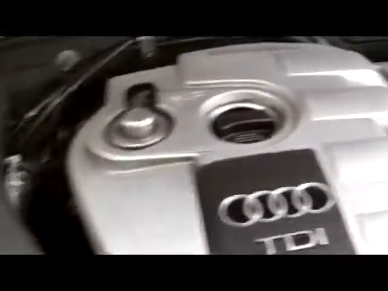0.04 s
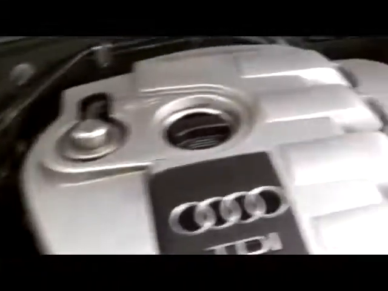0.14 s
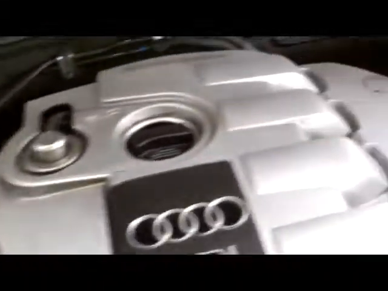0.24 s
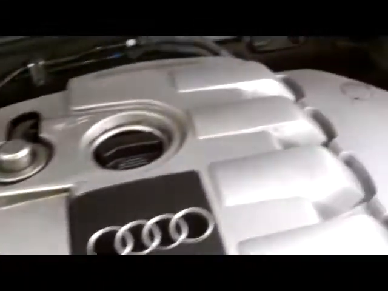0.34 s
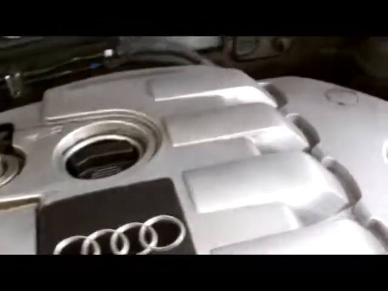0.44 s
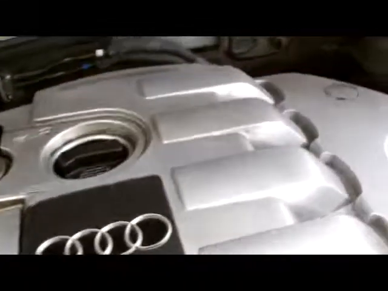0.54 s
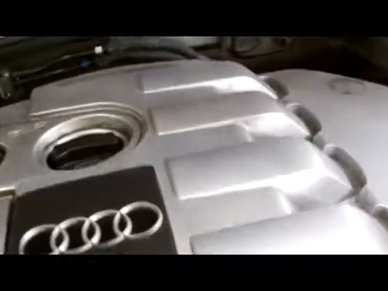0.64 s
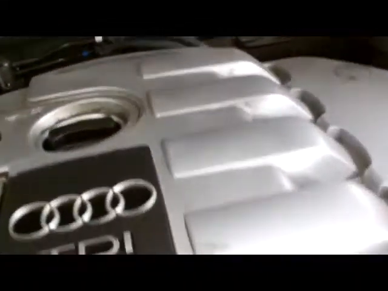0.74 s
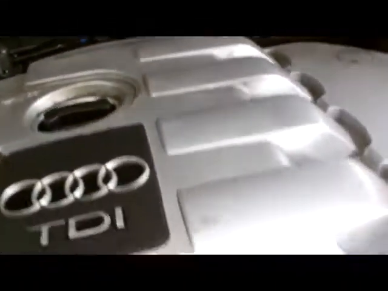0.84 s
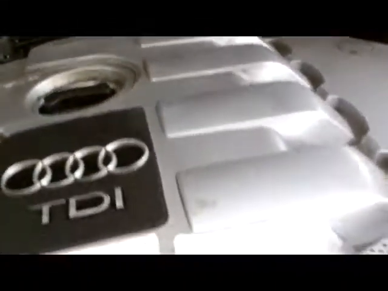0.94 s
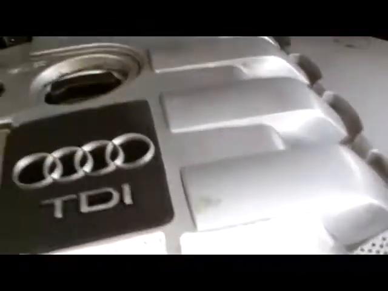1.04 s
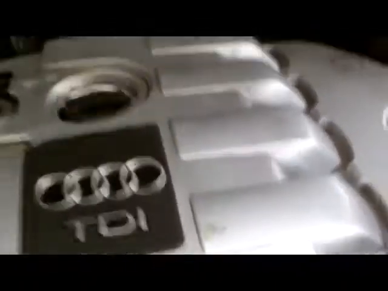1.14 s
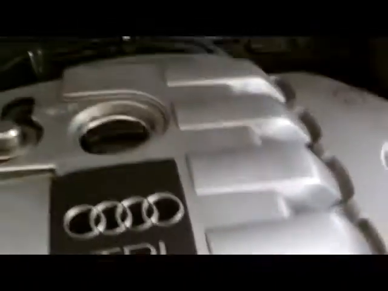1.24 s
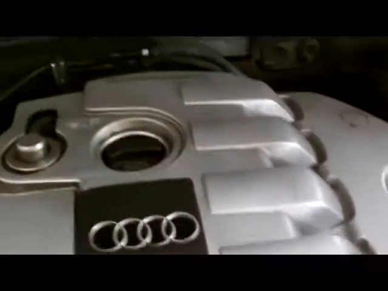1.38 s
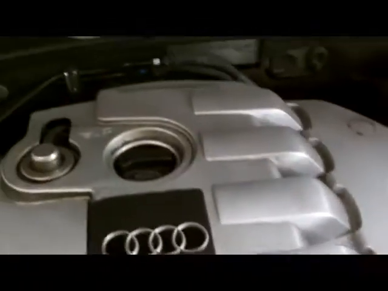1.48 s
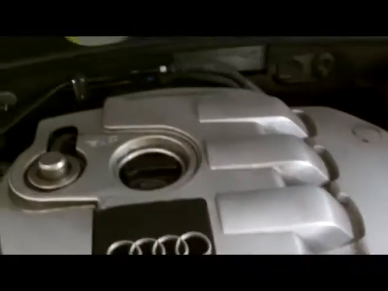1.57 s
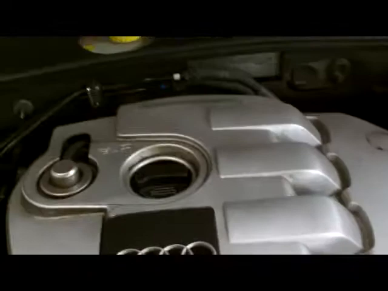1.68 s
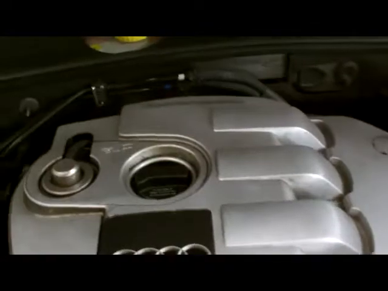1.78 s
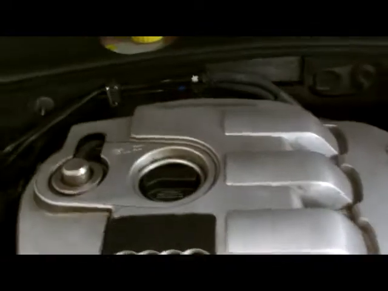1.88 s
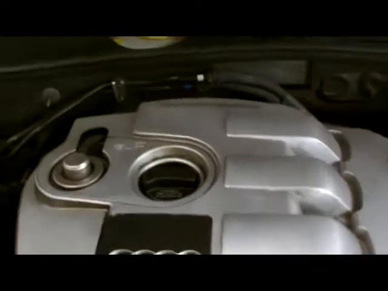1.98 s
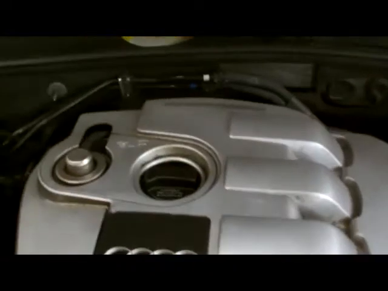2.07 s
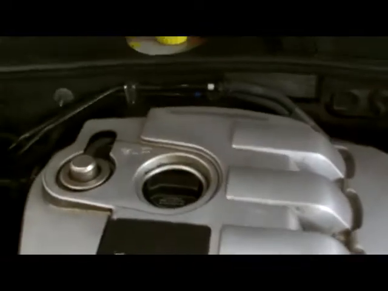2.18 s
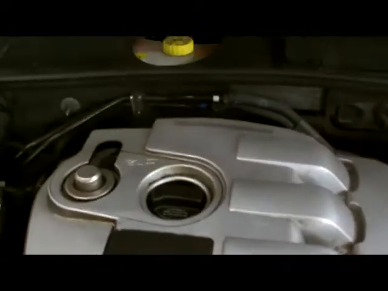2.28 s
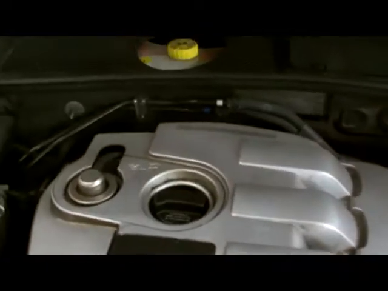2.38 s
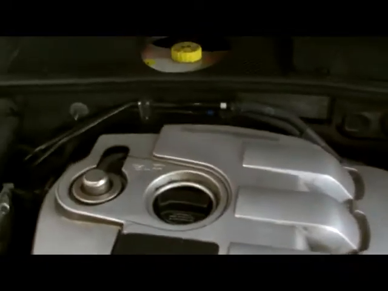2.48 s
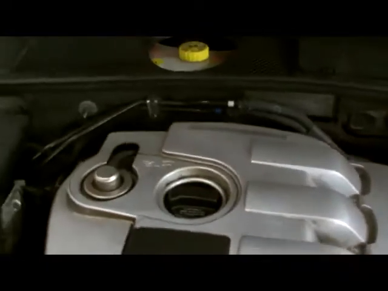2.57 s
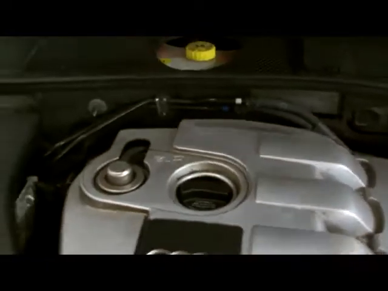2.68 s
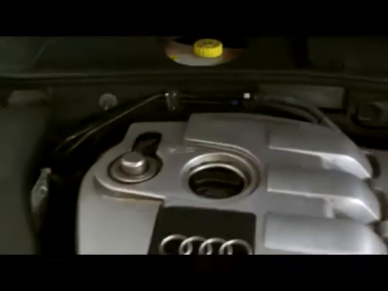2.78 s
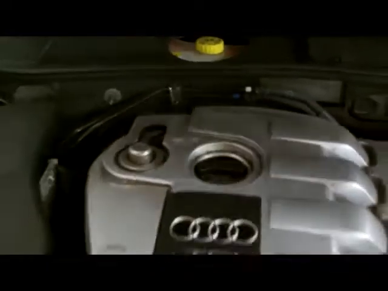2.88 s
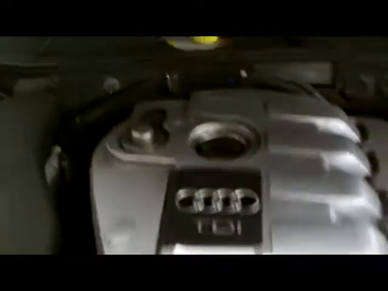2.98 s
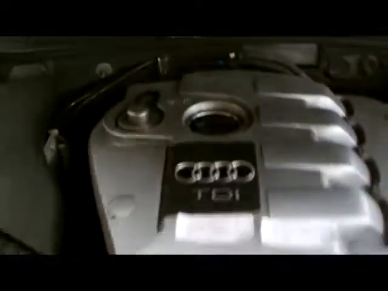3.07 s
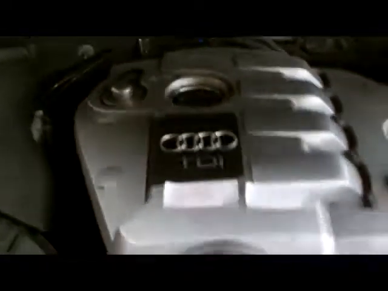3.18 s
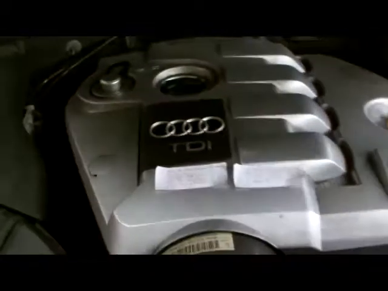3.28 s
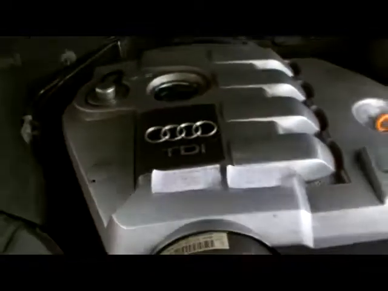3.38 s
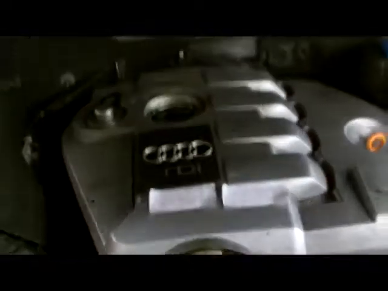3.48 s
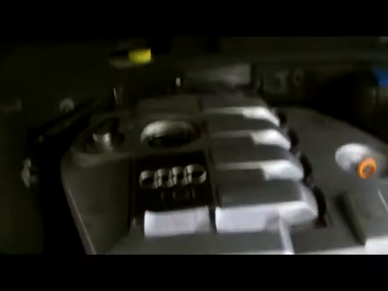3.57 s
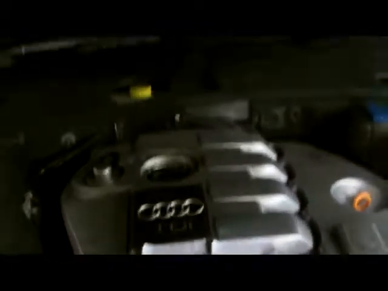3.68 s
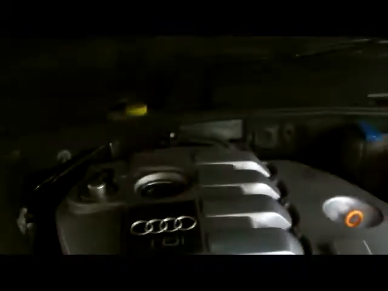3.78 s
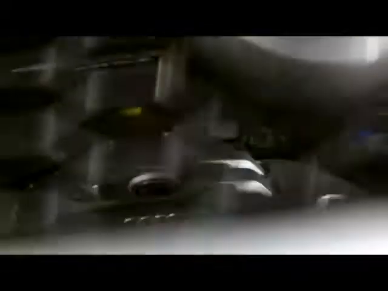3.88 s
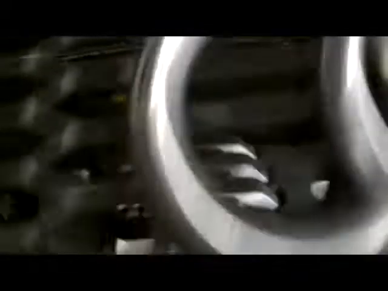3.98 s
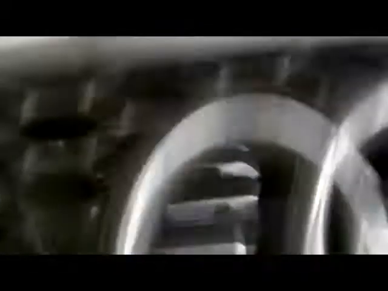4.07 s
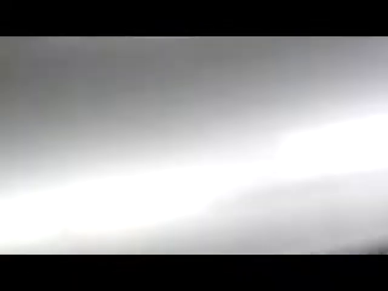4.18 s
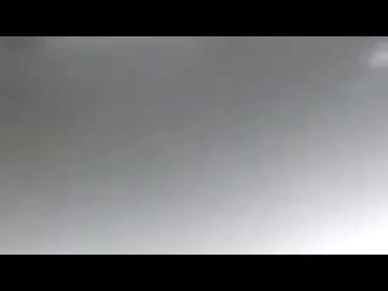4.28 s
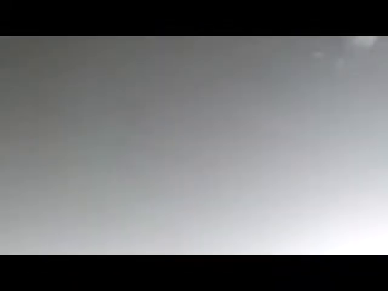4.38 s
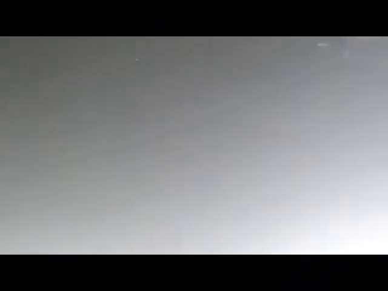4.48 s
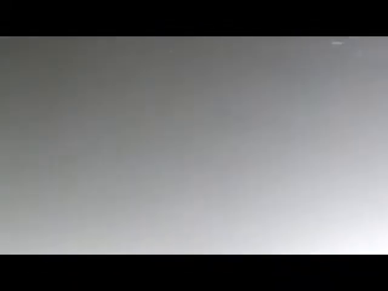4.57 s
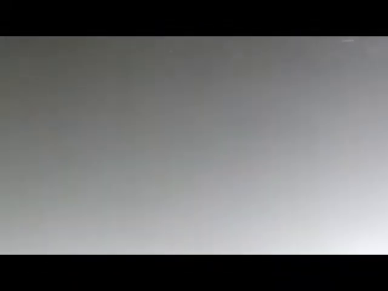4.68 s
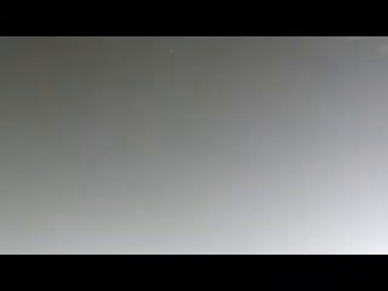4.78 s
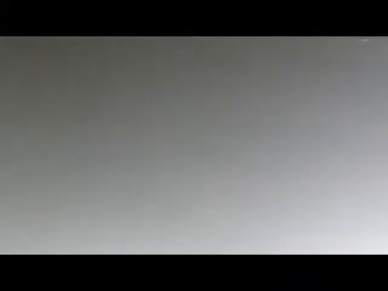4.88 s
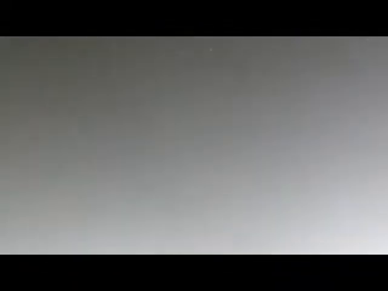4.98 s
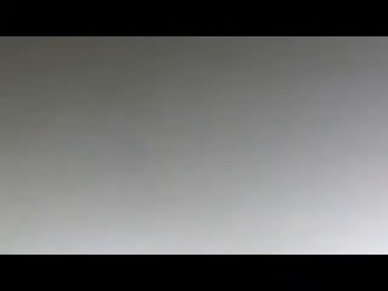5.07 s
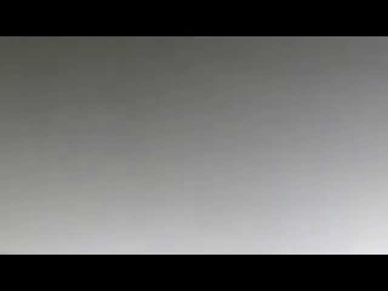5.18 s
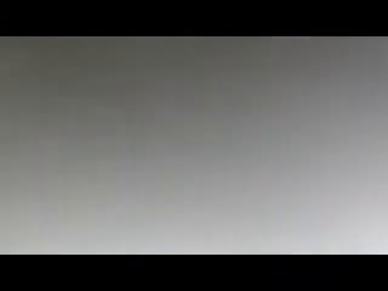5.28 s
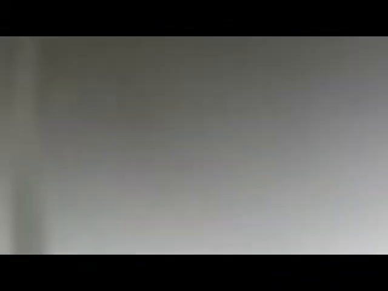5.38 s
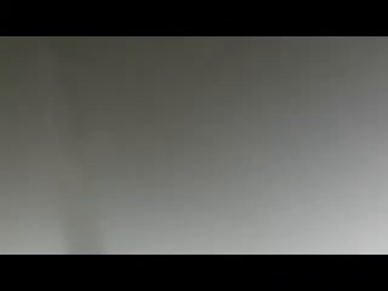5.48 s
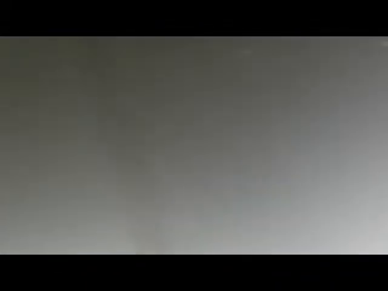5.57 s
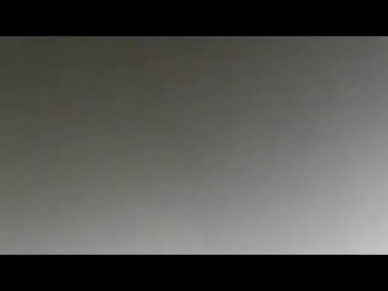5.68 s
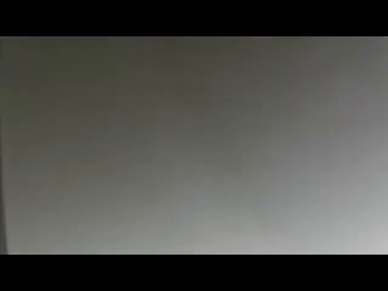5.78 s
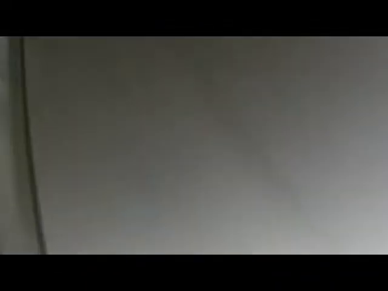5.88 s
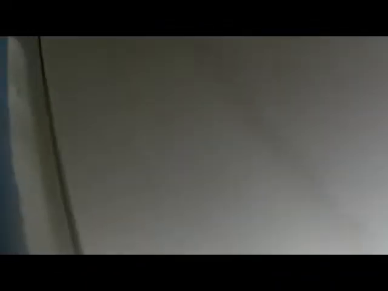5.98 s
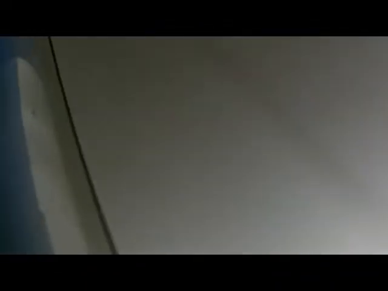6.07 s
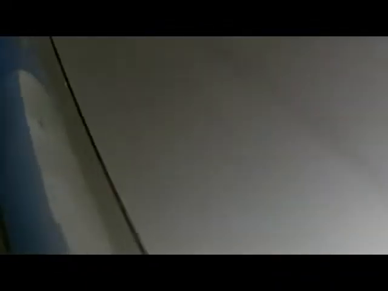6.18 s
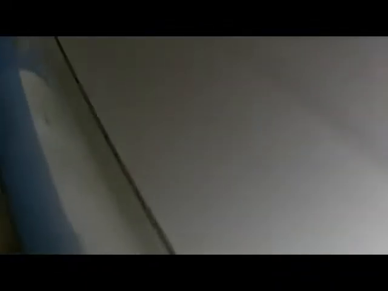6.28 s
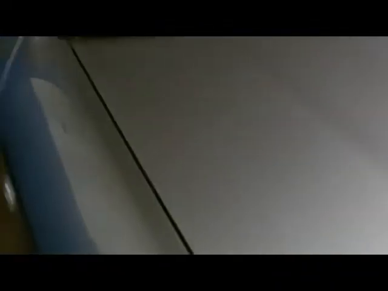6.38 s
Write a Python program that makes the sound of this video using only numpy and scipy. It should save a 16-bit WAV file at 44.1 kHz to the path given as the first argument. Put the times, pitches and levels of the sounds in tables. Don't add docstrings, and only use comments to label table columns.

```python
import sys
import numpy as np
from scipy import signal
from scipy.io import wavfile

SR = 44100
rng = np.random.default_rng(int(sys.argv[2]) if len(sys.argv) > 2 else 0)


def volts_from_db(level):
    exponent = np.asarray(level, float) / 20
    return 10 ** exponent


def materialize(psi):
    bounded = np.clip(np.atleast_2d(psi).T, -1, 1)
    quanta = np.round(bounded * 32767).astype(np.int16)
    wavfile.write(sys.argv[1], SR, quanta)


N = 284004
TIME = np.arange(N) / SR

# [f/Hz, density level/dB]
HUSH_SPECTRUM = [(35, -37), (60, -2.5), (113, -7.5), (193, -7), (301, -32), (785, 6), (946, -4.5),
                 (1040, -15), (1580, 2.5), (2350, -19), (2770, -7), (14600, -19.5), (16000, -23.5)]
# [f/Hz, t60/s, level/dB]
GARAGE_REVERB = [(62, 0.93, -8), (200.4, 0.84, -13.5), (500, 0.68, -12), (1200, 0.88, -16),
                 (2930, 0.83, -16), (6850, 0.72, -19.5), (14050, 0.37, -14)]
# [t/s, f/Hz, level/dB]
WHISTLE_GLIDE = [
    (0, 8070, -70),
    (.15, 8090, -66),
    (.22, 8090, -80),
    (.3, 8070, -78),
    (.42, 8070, -75),
    (.55, 8100, -80),
    (.72, 8120, -75),
    (.88, 8000, -89),
]
# [t/s, peak level/dB, fall per 10 dB/s]
HAND_JOLTS = [(0.0, -86, .01), (.64, -97, .04), (.97, -66, .07), (1.13, -64, .1), (1.28, -70, .06),
              (1.4, -70, 0.064), (1.65, -71, 0.053), (1.94, -83, .06), (2.17, -75, 0.043),
              (2.53, -69, 0.076), (2.89, -77, 0.059), (3.11, -80, .04), (3.3, -88.5, .08), (3.48, -80, .03),
              (3.62, -88, 0.59), (4.39, -53, 0.15), (4.77, -69.5, 0.2), (5.29, -77, 0.13),
              (5.42, -78.5, .08), (5.581, -64.5, 0.05), (5.67, -78, 0.11), (6.1, -89, 0.078),
              (6.35, -91.5, .06)]
# [t/s, level/dB]
STIRRING = [(0, -63.5), (.27, -69.5), (.6, -70), (.92, -69.5), (1.8, -68.5), (2.35, -67), (2.7, -72),
            (3.6, -72.5), (4.0, -73), (4.95, -79), (5.3, -66.5), (5.7, -68), (6.0, -67), (6.44, -70)]
# [peak t/s, rise/s, fall/s, peak level/dB, brightness/dB]
SCUFF_STROKES = [(.17, 0.11, 0.068, -60, -3), (.45, 0.21, 0.3, -67, 11), (.65, 0.49, 0.32, -71, -6.5),
                 (1.536, 0.058, 0.23, -62, -5), (1.698, 0.19, 0.051, -60, 9.5),
                 (1.92, 0.019, 0.076, -63.5, 1), (2.136, 0.064, .12, -54, 6), (2.26, 0.15, 0.018, -65, -4),
                 (2.82, 0.037, 0.023, -75, 21), (2.859, 0.03, 0.035, -59.5, 2),
                 (2.924, 0.046, 0.016, -58, 5), (2.99, 0.033, 0.052, -59.5, 9),
                 (3.15, 0.067, 0.04, -54.5, 7), (3.268, 0.027, 0.042, -44, 0),
                 (3.329, 0.054, 0.064, -47, 8), (3.39, .03, 0.062, -49, 1.5),
                 (3.44, 0.027, 0.041, -55.5, -1.5), (4.201, .08, 0.098, -61, 7.5),
                 (.05, 0.063, .1, -67.5, -9.5), (4.82, 0.11, 0.11, -73.5, -12),
                 (5.46, 0.041, 0.087, -60.5, -9.5), (5.87, 0.022, 0.082, -62, -6.5),
                 (6.09, 0.072, 0.068, -67, 14), (6.2, 0.18, 0.31, -61.5, 1)]
# [peak t/s, rise/s, fall/s, peak level/dB]
CLOTH_SWISHES = [(.82, .01, 0.035, -63), (2.74, .015, .02, -63), (2.83, .01, .01, -59.5),
                 (4.14, 0.046, 0.087, -55.5), (4.23, 0.075, 0.04, -53.5), (4.31, 0.069, 0.016, -49.5),
                 (4.72, .005, 0.017, -62.5), (5.52, 0.022, .01, -71), (5.63, .004, 0.0072, -65),
                 (6.2, .01, 0.014, -71), (6.28, .015, 0.014, -62), (6.41, .005, .01, -58)]
SCUFF_EDGES = [220, 500, 1600, 5000, 9300, 16000]
STIR_BANDS = [-4.5, -2.7, 0, -3, 0.5]
STROKE_BANDS = [-14, -1.5, 0.5, -2.13, -7.5]
BRIGHTNESS_TILT = [-1.1, -1.18, 0.33, 0.21, 1]
SWISH_BANDS = [-23, -11, -7, -6.5, 3]

# [t/s, clack peak level/dB, knock re clack level/dB, tick re clack level/dB, rattle decay/s]
STEP_BLOWS = [
    (5.424, -37, 7, -8, 0.005),
    (5.44, -48, 3, -2, 0.011),
    (5.469, -49.5, 6.5, -5, 0.0052),
    (5.49, -54.5, 1, -7, 0.032),
    (5.63, -57, -20.5, 8, 0.0022),
    (5.845, -47, -18.5, 3.5, 0.0029),
    (5.87, -66, -2.5, -8, 0.018),
    (6.115, -38.5, 3.5, -13, 0.0071),
    (6.407, -70, 7.5, 14, 0.0041),
]
THUMP_BLOWS = [
    (1.273, -50, 3, -10, 0.01),
    (1.42, -70, 17, -8, 0.021),
    (2.533, -51, 3, 3, 0.0053),
    (2.542, -50, -5, -2, 0.01),
    (2.558, -60.5, 9.5, -1, 0.01),
    (2.579, -60, 4.5, -24, 0.011),
    (2.597, -66.5, -5, -6, 0.0071),
    (2.625, -67.5, -8, 4, 0.007),
]
STAY_BLOWS = [
    (.9604, -36.5, 0, -2.5, 0.0053),
    (.966, -42, -4.5, -2, 0.0095),
    (1.0973, -14, 3, 0, 0.0022),
    (1.1014, -15.5, -2.5, -2, 0.0037),
    (1.116, -29.5, 5.5, -3, 0.006),
    (1.1495, -17, -6, 1.5, 0.0033),
    (1.22, -35, -18, -5, .003),
    (1.273, -31, -16, -7.5, 0.015),
    (1.42, -50, -1, 0, 0.0067),
    (1.644, -44.5, -2, -2, 0.011),
]
CATCH_BLOWS = [
    (2.84, -54.5, 8.5, 8, 0.0091),
    (2.9424, -25.5, -4, 2, 0.0053),
    (3.0968, -19.5, -12, 5, 0.0019),
    (3.1027, -36, 0, 9.5, 0.0069),
    (3.246, -40.5, 0.5, 3.5, .006),
    (3.299, -36.5, 3, 4, 0.0035),
    (3.3864, -49, 7.5, -7, 0.0033),
    (3.401, -44.5, 7, -11.5, 0.0038),
    (3.6884, -63.5, 5.5, -13.5, 0.0034),
    (4.0, -65, 2.5, -10, .005),
]
SLAM_BLOWS = [
    (4.3856, -14, -6, -1, 0.00041),
    (4.3868, -6, -6, -0.2, 0.0019),
    (4.390, -10.5, -10.5, -3.5, 0.003),
    (4.3975, -9.5, -9, -3, 0.0033),
    (4.404, -20, -8, -0.5, 0.01),
    (4.411, -18, -4.5, -0.5, 0.0041),
    (4.417, -19, -9.5, 2, 0.0034),
    (4.425, -24, -0.5, -4, .004),
]
# [f/Hz, bandwidth f/Hz, level/dB]
SOLE_RESONANCES = [(232, 20, 0.39), (559, 39, 4), (696, 155, 3.9), (1185, 490, 6.6)]
THUMP_RESONANCES = [(220, 38, 0.47), (345, 60, 0.84), (510, 69, 9.3)]
STAY_RESONANCES = [(270, 97, 0), (480, 20, 8), (923, 110, 9), (1296, 23, 5), (1600, 120, 1.5),
                   (1796, 23, 10), (2970, 120, -0.5), (6810, 410, 8), (8040, 430, 3.5)]
CATCH_RESONANCES = [(674, 72, 3), (1215, 140, 15), (1750, 134, 5.3), (2740, 210, 12), (3380, 73, 1.1),
                    (6670, 120, 11)]
PANEL_RESONANCES = [(196, 17, 0.94), (515, 45, 7.6), (691, 42, 12), (915, 62, 0.42), (1136, 65, 3.4),
                    (1820, 30, 0.7), (2460, 130, 1.4), (4120, 43, 2), (5570, 110, 1), (6400, 850, 4.1)]
SOLE_EDGES = [90, 300, 1000, 2500, 16000]
THUMP_EDGES = [90, 350, 640, 2500, 16000]
STAY_EDGES = [100, 650, 2000, 5500, 16000]
CATCH_EDGES = [300, 1080, 2200, 5500, 16000]
PANEL_EDGES = [170, 520, 1100, 5000, 16000]


def rms_one(x):
    return x / np.sqrt(np.mean(x ** 2) + 1e-20)


def band(x, low_hz, high_hz, order=2):
    sos = signal.butter(order, [low_hz, high_hz], "band", fs=SR, output="sos")
    return signal.sosfilt(sos, x + 1e-18)


def high_pass(x, hz, order):
    return signal.sosfilt(signal.butter(order, hz, "high", fs=SR, output="sos"), x)


def at_hz(points, hz, column=1):
    table = np.array(points)
    return np.interp(np.log(hz), np.log(table[:, 0]), table[:, column])


def drift(rate_hz):
    return rms_one(band(rng.standard_normal(N), rate_hz / 8, rate_hz, order=1))


def half_octave_bank(noises):
    edges = 25 * 2 ** np.arange(0, 9.6, .5)
    return [(np.sqrt(low * high), band(noises[k % 2], low, high))
            for k, (low, high) in enumerate(zip(edges, edges[1:]))]


def swell(peak_s, rise_s, fall_s, bend):
    before = (peak_s - TIME) / max(rise_s, .004)
    after = (TIME - peak_s) / max(fall_s, .004)
    return -10 * np.where(TIME < peak_s, before, after) ** bend


def air(patchy_db):
    bank = half_octave_bank(rng.standard_normal((2, 2, N)))
    hush = sum(x * volts_from_db(at_hz(HUSH_SPECTRUM, hz) + patchy_db * drift(1.2)) for hz, x in bank)
    return volts_from_db(-70) * rms_one(hush)


def garage(paths):
    t = np.arange(round(1.2 * SR)) / SR
    bank = half_octave_bank(rng.standard_normal((2, 3, 2, len(t))))
    tail = sum(x * volts_from_db(at_hz(GARAGE_REVERB, hz, column=2) - 60 * t / at_hz(GARAGE_REVERB, hz)) for hz, x in bank)
    build_up = 1 - np.exp(-(t / 0.0027) ** 2)
    tail = tail * build_up * volts_from_db(-26.5)
    return signal.fftconvolve(paths[:, None], tail, axes=2).sum(axis=0)[:, :N]


def whistle():
    s, hz, db = np.transpose(WHISTLE_GLIDE)
    phase = 2 * np.pi * np.cumsum(np.interp(TIME, s, hz) + 12 * drift(17.0)) / SR
    partial_db = 1 + 5 * drift(3.9) - 12 * (TIME < .25)
    tone = np.sin(phase) + volts_from_db(partial_db) * np.sin(1.49 * phase)
    level_db = np.interp(TIME, s, db, right=-150) + 4.0 * drift(5.5)
    return tone * volts_from_db(level_db) * [[1.2], [.8]]


def shake():
    power = volts_from_db(-110) ** 2
    for s, db, fall_s in HAND_JOLTS:
        power = power + volts_from_db(db + swell(s, rise_s=.012, fall_s=fall_s, bend=1.1)) ** 2
    rumble = band(rng.standard_normal((2, N)), 27, 112.6, order=3)
    return rms_one(rumble) * np.sqrt(power)


def scuffs(grain_db, flicker_db):
    power = volts_from_db(np.interp(TIME, *np.transpose(STIRRING)) + np.c_[STIR_BANDS]) ** 2
    for s, rise_s, fall_s, db, bright_db in SCUFF_STROKES:
        band_db = db + np.c_[STROKE_BANDS] + bright_db * np.c_[BRIGHTNESS_TILT]
        power = power + volts_from_db(band_db) ** 2 * volts_from_db(swell(s, rise_s, fall_s, bend=1.65)) ** 2
    for s, rise_s, fall_s, db in CLOTH_SWISHES:
        power = power + volts_from_db(np.c_[SWISH_BANDS]) ** 2 * volts_from_db(db + swell(s, rise_s, fall_s, bend=1.5)) ** 2
    grit = rng.standard_normal((5, 2, N))
    grain_size = np.minimum(rng.exponential(1, N), 5)
    grit = grit * volts_from_db(grain_db * grain_size)
    shared = drift(40.0)
    out = 0
    for grains, band_power, low, high in zip(grit, power, SCUFF_EDGES, SCUFF_EDGES[1:]):
        flicker = volts_from_db(flicker_db * (shared + drift(25.0)))
        out = out + rms_one(band(grains, low, high)) * np.sqrt(band_power) * flicker
    return out


def resonate(x, modes, ring_db):
    out = x.copy()
    for hz, width_hz, db in modes:
        radius = np.exp(-np.pi * max(width_hz, 40, hz / 40) / SR)
        b = (1 - radius ** 2) / 2 * np.array([1, 0, -1])
        a = [1, -2 * radius * np.cos(2 * np.pi * hz / SR), radius ** 2]
        out += volts_from_db(min(db, 12) + ring_db) * signal.lfilter(b, a, x)
    return out


def blows(rows, modes, edges, heft_db, trim_db, room_db):
    first_s, first_db = rows[0][:2]
    start, size = round(first_s * SR), round((rows[-1][0] - first_s + .5) * SR)
    out, t = np.zeros((5, N + size)), np.arange(6000) / SR
    for k, (s, clack_db, knock_db, tick_db, decay_s) in enumerate(rows):
        thud_db = heft_db - 0.24 * (clack_db - first_db)
        envelope = np.exp(-t / np.clip(decay_s, .0005, .03)) * (1 - np.exp(-t / 0.00056))
        rattle = rng.standard_normal((4, 2, len(t))) * envelope
        i = round(s * SR)
        for part, db, low, high in zip(rattle, [thud_db, knock_db, 0, tick_db], edges, edges[1:]):
            mid, side, pulse = band(np.vstack([part, t == 0]), low, high, order=3)
            gain = volts_from_db(clack_db + db + trim_db) / np.abs(mid).max()
            out[:2, i:i + len(t)] += gain * np.array([mid, side])
            out[2 + k % 3, i:i + len(t)] += gain * volts_from_db(room_db) * rms_one(pulse) * mid.std()
    span = slice(start, start + size)
    out[:2, span] = resonate(out[:2, span], modes, ring_db=0)
    out[2:, span] = resonate(out[2:, span], modes, ring_db=-13.5)
    return out[:, :N]


def steps():
    return blows(STEP_BLOWS, SOLE_RESONANCES, SOLE_EDGES, heft_db=-16.0, trim_db=-3.0, room_db=4.0)


def thumps():
    return blows(THUMP_BLOWS, THUMP_RESONANCES, THUMP_EDGES, heft_db=6.0, trim_db=2.0, room_db=-1.0)


def stay():
    return blows(STAY_BLOWS, STAY_RESONANCES, STAY_EDGES, heft_db=-11.0, trim_db=-1.5, room_db=9.5)


def catch():
    return blows(CATCH_BLOWS, CATCH_RESONANCES, CATCH_EDGES, heft_db=-16.0, trim_db=-4.5, room_db=10.0)


def latch():
    t = np.maximum(TIME - 4.3863, 0)
    rise_s, ring_s = 0.00047, 0.00045
    envelope = (1 - np.exp(-t / rise_s)) ** 2 * np.exp(-t / ring_s)
    return volts_from_db(4) * np.sin(2 * np.pi * 7200 * t) * envelope


def slam():
    return blows(SLAM_BLOWS, PANEL_RESONANCES, PANEL_EDGES, heft_db=-16.5, trim_db=-0.5, room_db=2.5)


def port(x, hz, sharpness, above):
    w = 2 * np.pi * hz / SR
    c, a = np.cos(w), np.sin(w) / (2 * sharpness)
    below_b = (1 - c) / 2 * np.array([1, 2, 1])
    above_b = (1 + c) / 2 * np.array([1, -2, 1])
    return signal.lfilter(below_b - above * above_b, [1 + a, -2 * c, 1 - a], x)


def scene():
    struck = stay() + catch() + slam() + thumps() + steps()
    rubbing = scuffs(grain_db=2.0, flicker_db=0.85)
    echoes = garage(struck[2:] + volts_from_db(-6.5) * rubbing[0])
    hush = air(patchy_db=-2.0)
    mid, apart = struck[:2] + echoes + rubbing + whistle() + latch() * np.c_[[1, .3]]
    side = volts_from_db(-23.5) * struck[1] + volts_from_db(-32) * echoes[1] + volts_from_db(-24.0) * rubbing[1]
    side = side + volts_from_db(-5.5) * high_pass(apart, 7000, order=5)
    left = port(mid + side, hz=7940, sharpness=2.48, above=0.19)
    right = port(mid - side, hz=11860, sharpness=1.1, above=0.18)
    airborne = np.array([volts_from_db(-1.6) * left, volts_from_db(-1.51) * right])
    airborne = airborne + hush[0] + volts_from_db(-3) * hush[1] * [[1], [-1]]
    airborne = high_pass(airborne, 110, order=4)
    hand, wobble = shake()
    return airborne + hand + volts_from_db(-15.5) * wobble * [[1], [-1]]


def band_limit(x):
    return signal.sosfilt(signal.butter(12, 16540, fs=SR, output="sos"), x)


def record(dry):
    bright = dry + volts_from_db(-19) * band(dry, 3700, 9700, order=1) + 0.31 * band(dry, 8600, 19000, order=1)
    mix = 1.15 * np.tanh(bright / 1.15)
    mix = signal.sosfilt(signal.cheby2(10, 24, 15500, fs=SR, output="sos"), mix)
    mix = signal.sosfilt(signal.cheby2(12, 40, 17000, fs=SR, output="sos"), mix)
    return band_limit(mix)


dry = scene()
out = record(dry)
materialize(out)
```